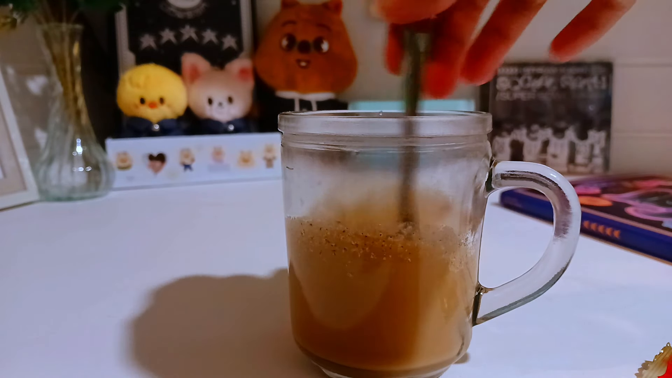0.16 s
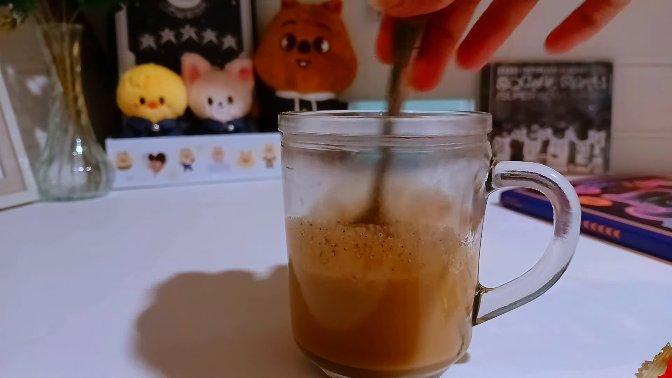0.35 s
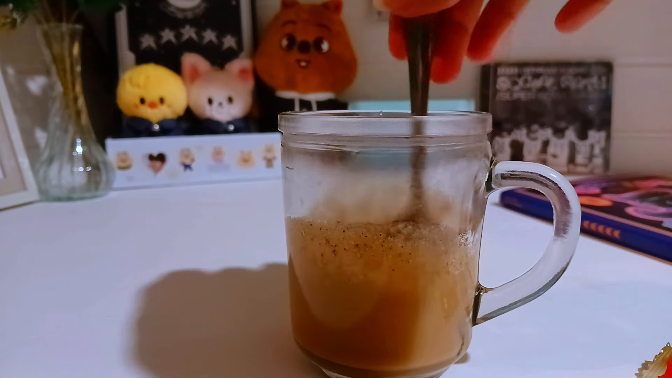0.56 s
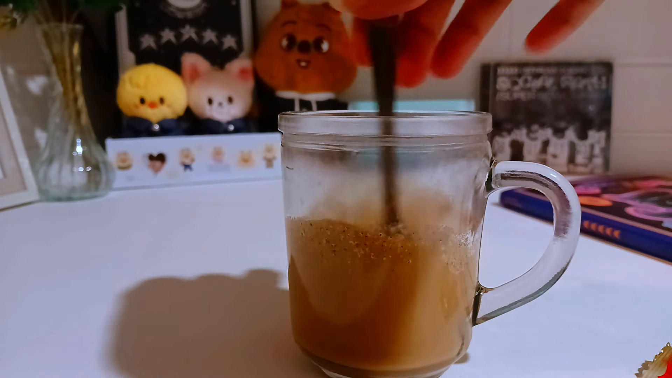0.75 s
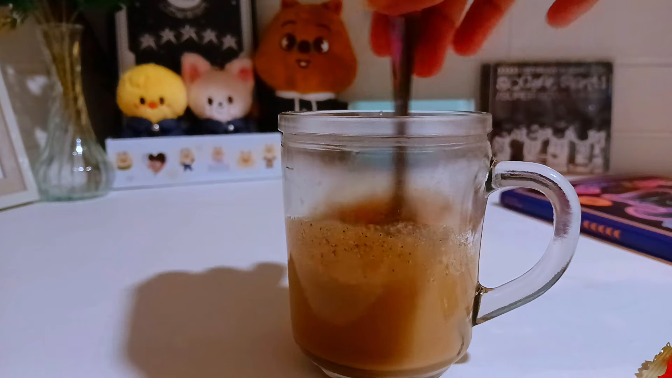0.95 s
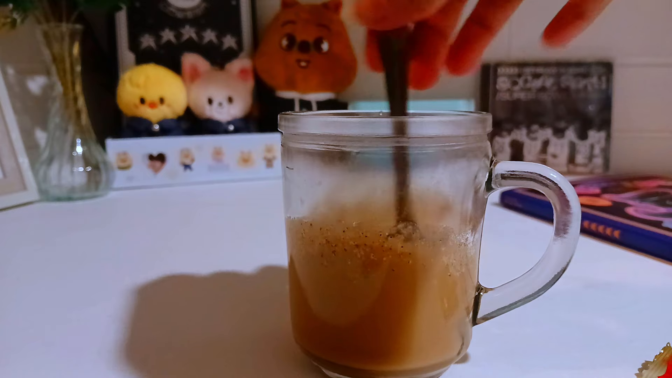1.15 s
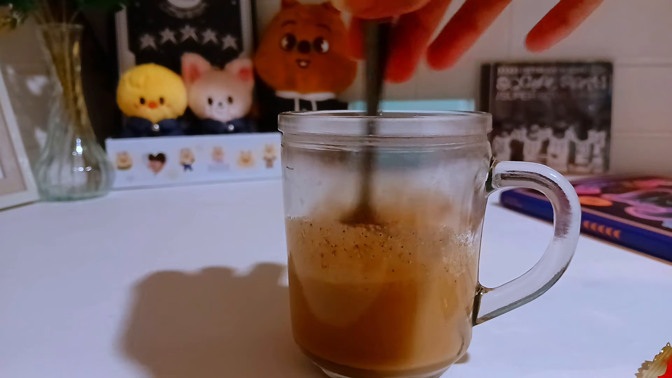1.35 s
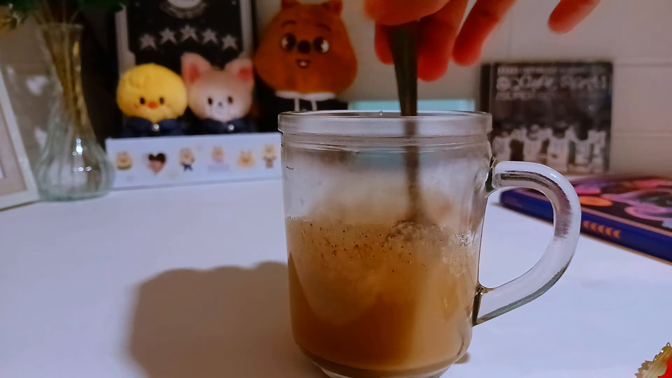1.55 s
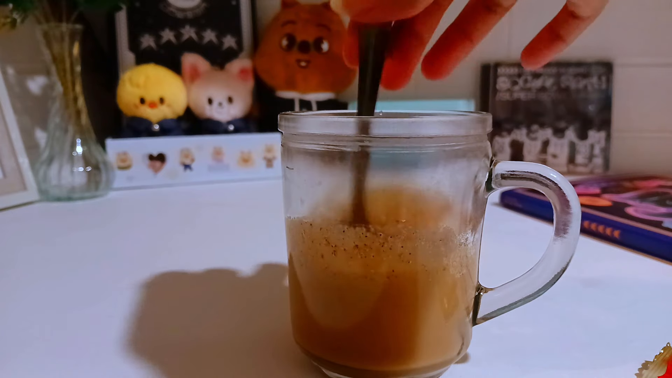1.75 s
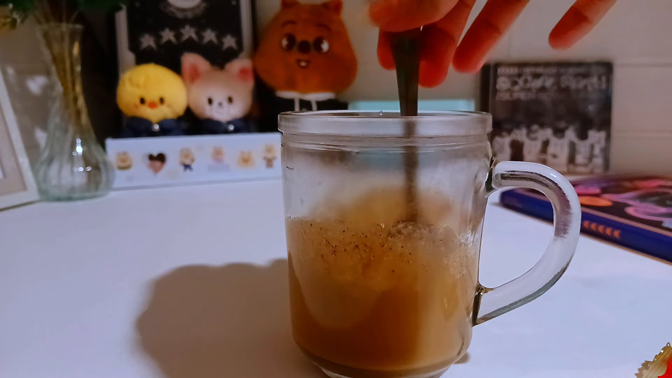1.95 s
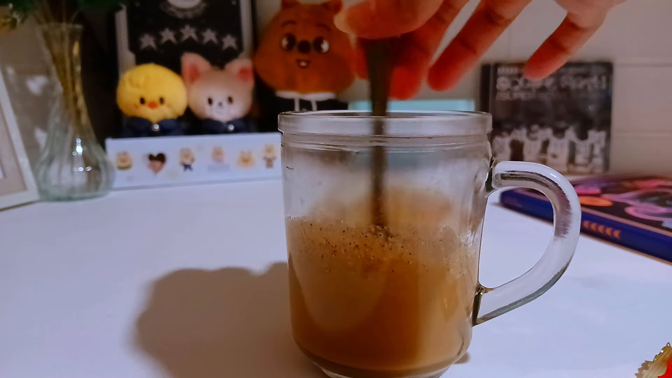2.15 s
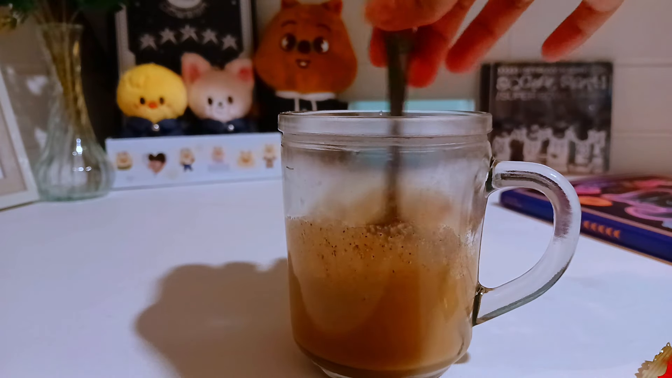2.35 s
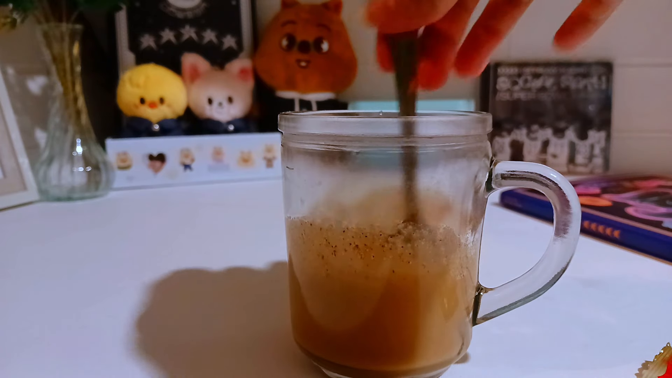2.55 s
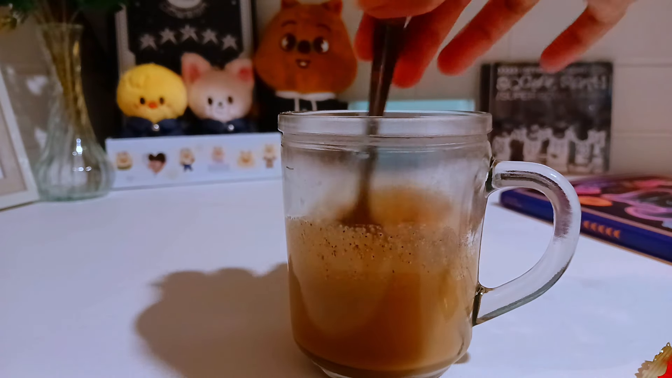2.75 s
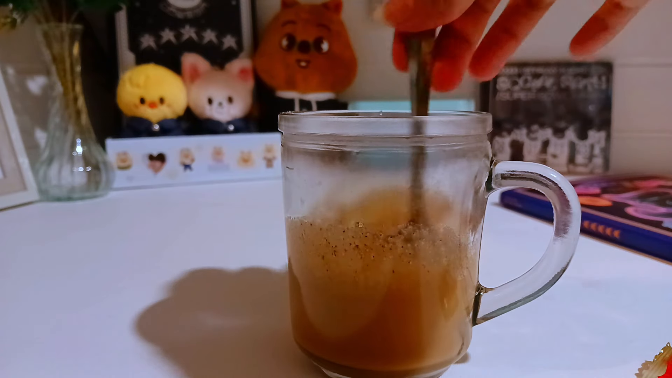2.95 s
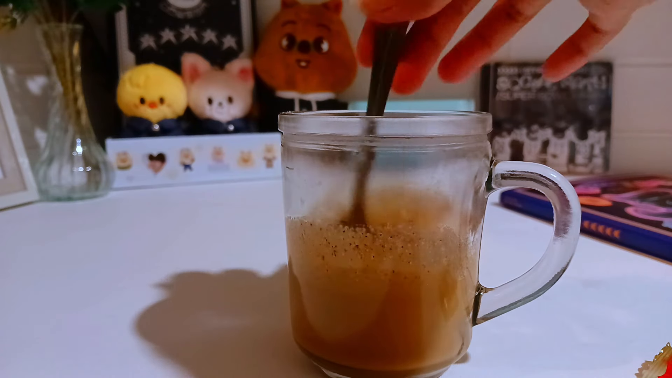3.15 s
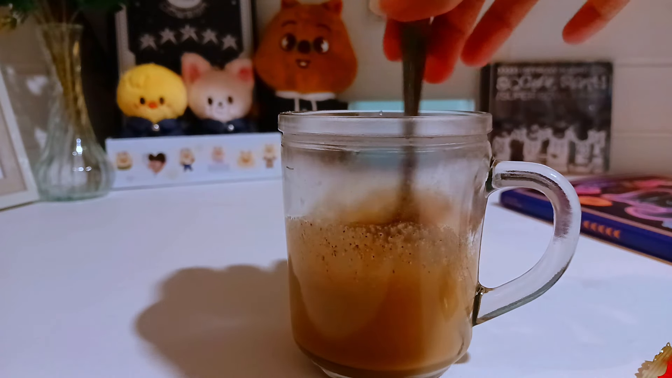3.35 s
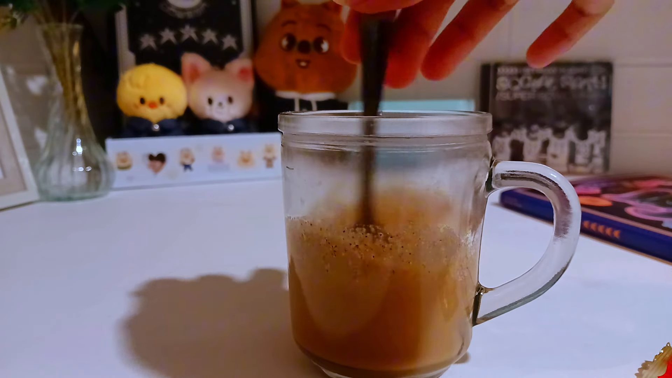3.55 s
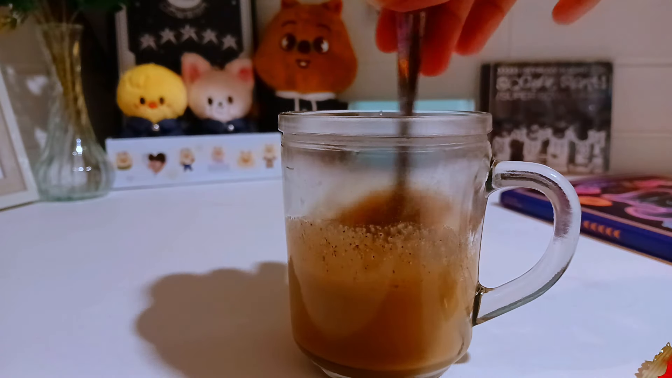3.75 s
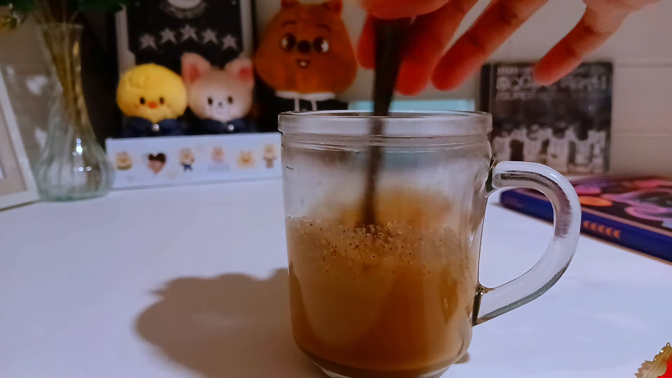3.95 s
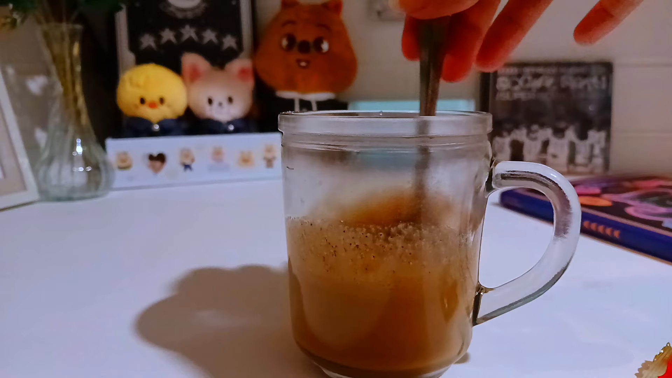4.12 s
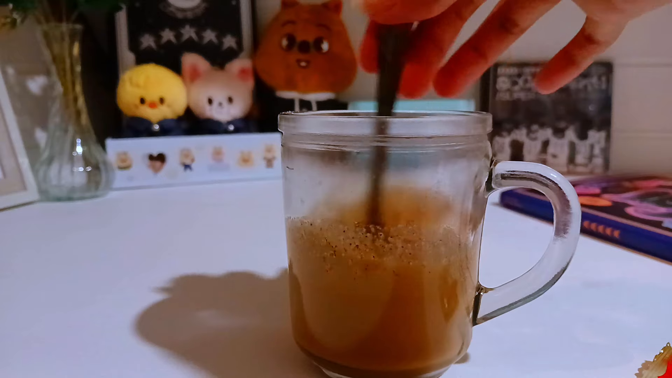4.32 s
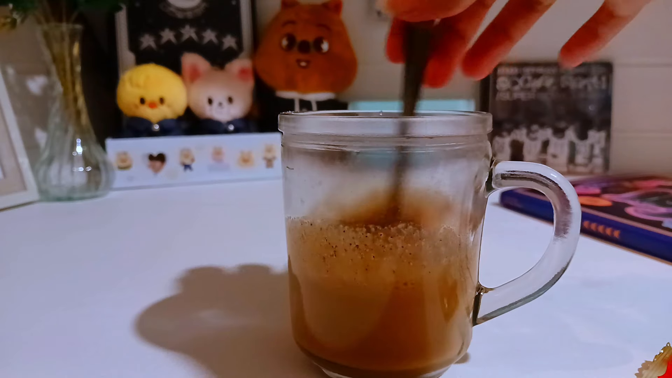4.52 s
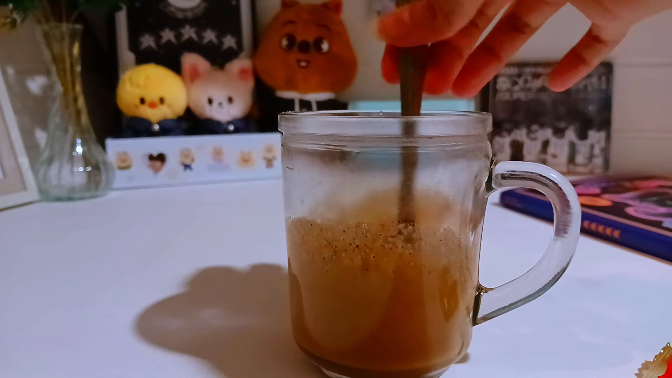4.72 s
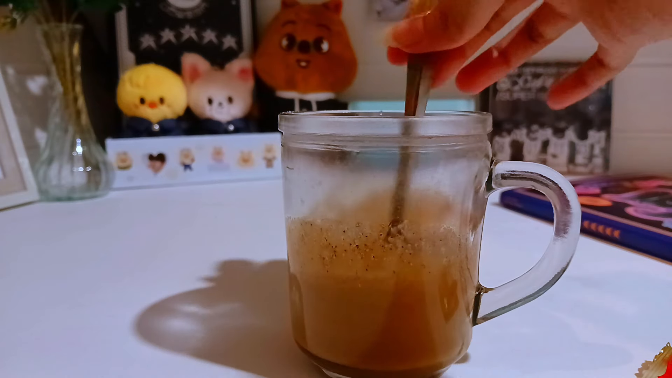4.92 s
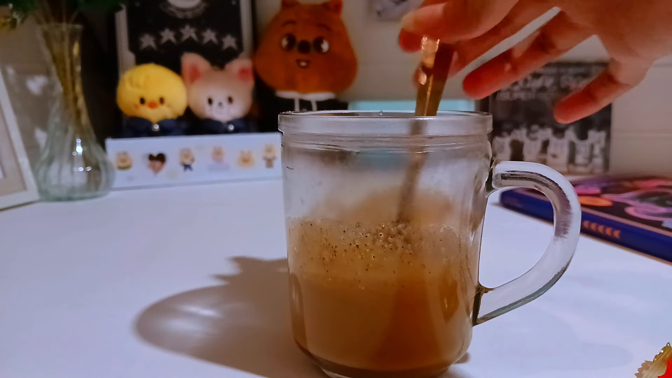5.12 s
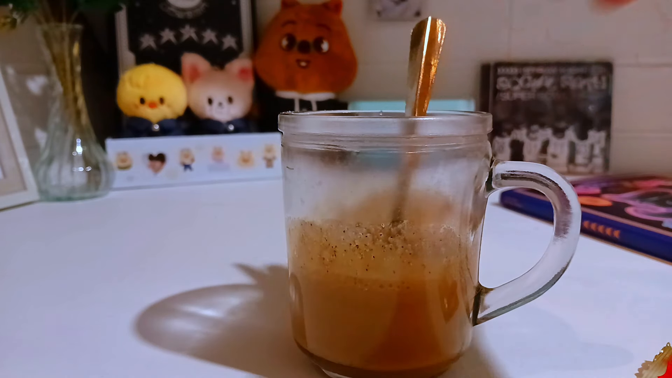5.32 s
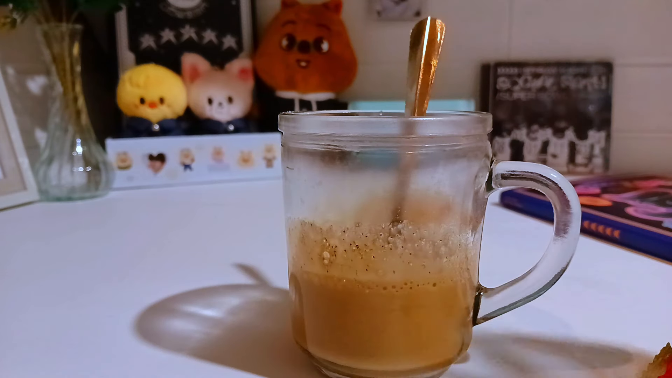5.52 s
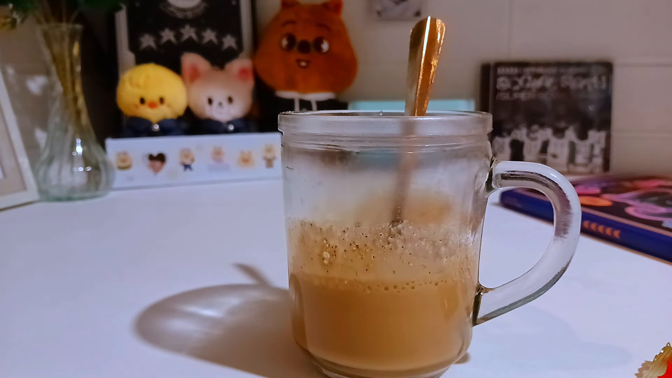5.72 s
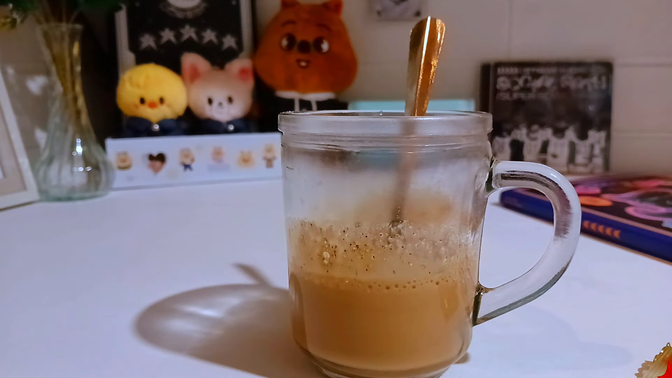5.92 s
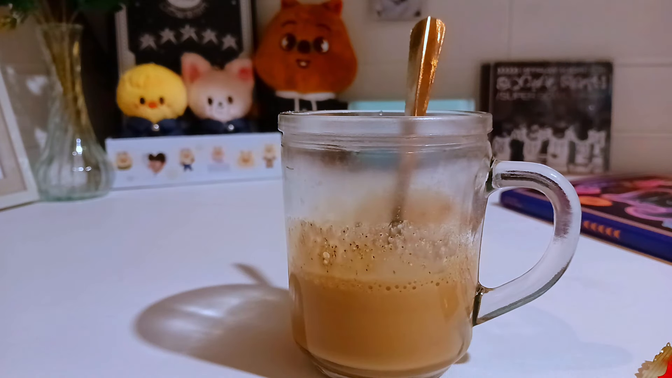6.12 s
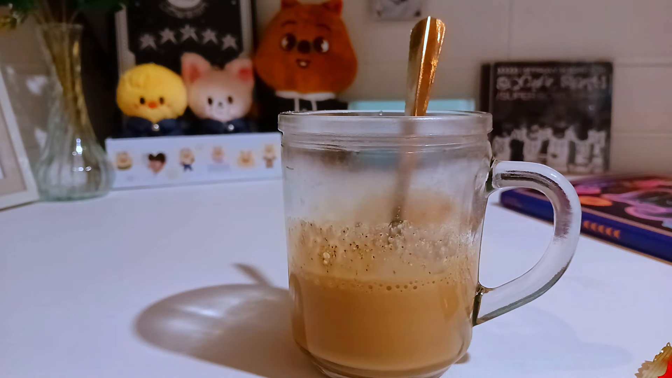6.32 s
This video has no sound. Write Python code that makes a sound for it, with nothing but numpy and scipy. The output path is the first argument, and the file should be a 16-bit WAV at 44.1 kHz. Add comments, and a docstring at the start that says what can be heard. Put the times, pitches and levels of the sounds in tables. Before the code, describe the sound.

From the start to about 4.7 seconds, a steel spoon stirs briskly in a partly filled glass mug on a desk, heard very close in stereo by a phone. The motion swells roughly three times a second, with irregular firm clinks and smaller touches between. Each blow has a crisp tick, a short liquid-muted glass ring around 2 kHz and higher, and a hollow knock near 1 kHz. Fine scraping, a soft watery wash, small gurgles and rounded plops rising in pitch fill the gaps. Two faint plops come near 4.95 seconds as the spoon is released; from 5.07 to 5.25 it rattles lightly and brightly on the rim, fading. Quiet follows until a dull, ringless desk tap at 6.2 seconds. A wavering low hum, bassy rumble and very faint hiss continue throughout; the small room adds a brief tail until the end at about 6.4 seconds.

```python
"""Over a low hum, a rumble and a faint hiss, a steel spoon clinks and scrapes in a glass mug of milky drink.
The mug stands on a desk close to a phone's two microphones, and the stirring swells about three times a second.
Each blow ticks, rings the liquid-damped glass and the spoon, and knocks on the air and desk around the drink.
Air bubbles with rising pitch make the drink plop and gurgle over a soft wash of noise.
Once let go, the spoon rattles to rest, and a dull tap follows; a small room adds a short tail."""
import sys
import numpy as np
from scipy import signal
from scipy.fft import rfft, irfft, next_fast_len
from scipy.io import wavfile
from scipy.ndimage import uniform_filter1d

SR = 44100
rng = np.random.default_rng(int(sys.argv[2]) if len(sys.argv) > 2 else 0)


def to_wav(sig):
    """Store sig (one row per channel, or 1-D mono) as 16-bit WAV at the path in sys.argv[1].

    Samples outside -1..1 are clipped; the rate is SR.
    """
    pcm = np.clip(np.atleast_2d(sig), -1, 1) * 32767
    pcm = np.round(pcm).astype(np.int16)
    wavfile.write(sys.argv[1], SR, pcm.T)  # frames by channels


N = 281356  # length in samples

# ways the spoon's bowl rings, with relative levels:
# (pitch [Hz], time to fade by 60 dB [s], level [dB], left minus right [dB], left phase lead [rad])
SPOON_MODES = [(9440, .06, -9, -3, -1.5), (9530, .035, -4, -3, -.6), (9730, .035, -4, -3, 2.6),
               (10140, .04, 0, 4, .5), (10060, .018, 0, 1, -2.4), (10330, .06, -10, 5, -.5),
               (10600, .02, -10, 4, -2.2), (12710, .085, -13, -3, 2.2), (14210, .06, -24, -2, .5),
               (14560, .04, -20, -2, -.5)]
# air above the drink, mug foot and desk top, with relative levels:
# (pitch [Hz], time to fade by 60 dB [s], level [dB], left minus right [dB], left phase lead [rad])
HOLLOW_MODES = [(437.7, 0.22, -18, -2.5, 0.37), (590.3, 0.16, -17, -2.5, 0.45),
                (719, 0.13, -13, -1.5, 0.77), (818, 0.1, -12, -14, 0.52), (1014.4, 0.087, 1.5, -0.5, .8),
                (1091, 0.048, 4.5, -1.5, 0.53), (1274, 0.064, -2, -5, 0.88), (1439, 0.051, 1, -4.5, 0.3),
                (1558, 0.063, -7, 3, 0.44), (1540, 0.087, -21.5, -10, 0.44)]
# tone colour of a soft thud or splash: (frequency [Hz], relative level [dB])
THUD_COLOUR = [(200, -13), (400, -8.5), (700, -0.5), (1100, 0.5), (1550, -9), (1900, -10.5), (3000, -20),
               (6000, -32), (16000, -28)]

RING = int(.25 * SR)  # longest ring of one event, in samples
ATTACK = int(.025 * SR)  # opening stretch over which an event's level is set, in samples
AGE = np.arange(RING) / SR  # seconds since an event began
SIDES = np.array([[.5], [-.5]])  # half of a left-right difference for each microphone

# the spoon circles the mug and is fastest once a lap; when it stops the drink settles
LAP_S, FASTEST_S, LAP_SWING_DB = .352, 0.024, 4
STOP_S, SETTLE_S, REST_DB = 4.72, 0.047, -4.5


def undb(db):
    """Turn decibels into a gain."""
    return 10 ** (np.asarray(db) / 20)


def fade(t60):
    """A decay that loses 60 dB in t60 seconds."""
    return np.exp(-np.log(1000) * AGE / t60)


def level(x, db, size=None):
    """Scale x so that its first size samples (or all of them) have an rms of db."""
    return x * undb(db) / np.sqrt(np.mean(x[..., :size] ** 2) + 1e-30)


def curve(rows):
    """Join the levels of a (time, level) table by straight lines."""
    rows = np.array(rows)
    return np.interp(np.arange(N) / SR, rows[:, 0], rows[:, 1])


def add(out, s, x):
    """Mix x into out from s seconds on."""
    i = max(int(s * SR), 0)
    out[..., i:i + x.shape[-1]] += x[..., :N - i]


def colour(x, points):
    """Shape x by (Hz, dB) points with a filter that never sounds ahead of its input."""
    hz, db = np.transpose(points)
    size = next_fast_len(x.shape[-1] + 4096, True) // 2 * 2
    f = np.maximum(np.fft.rfftfreq(size, 1 / SR), 1)
    # folding the cepstrum forward in time gives the filter minimum phase
    cepstrum = irfft(np.log(undb(np.interp(np.log(f), np.log(hz), db))))
    cepstrum[1:size // 2] *= 2
    cepstrum[size // 2 + 1:] = 0
    return irfft(rfft(x, size) * np.exp(rfft(cepstrum)))[..., :x.shape[-1]]


def ports(x, pan_db, lead_ms):
    """One sound at two microphones: a level difference, and a longer path to the right one."""
    f = np.fft.rfftfreq(len(x), 1 / SR)
    late = irfft(rfft(x) * np.exp(-2j * np.pi * f * lead_ms / 1000), len(x))
    return np.array([x * undb(pan_db / 2), late * undb(-pan_db / 2)])


def ring(modes, scatter_db, detune, wobble=0.27):
    """Modes struck once; the spot hit sets their strength, and the moving drink makes each ring unsteady."""
    out = np.zeros((2, RING))
    chances = rng.standard_normal((len(modes), 4))  # random pitch, strength, balance and sign
    for (hz, t60, db, pan_db, lead), c in zip(modes, chances):
        age = AGE[:int(1.3 * t60 * SR)]
        knots = AGE[::220]  # a new random target every 5 ms
        sway, drift = (np.interp(age, knots, row) for row in rng.standard_normal((2, len(knots))))
        turn = 2 * np.pi * hz * (1 + detune * c[0]) * age + wobble * drift
        gain = np.sign(c[3]) * undb(db + scatter_db * c[1] + SIDES * (pan_db + 2 * c[2]))
        envelope = np.exp(wobble * sway - np.log(1000) * age / t60)
        out[:, :len(age)] += gain * envelope * np.sin(turn + SIDES * lead)
    return out


def burst(points, t60, tail_db, tail_t60, pan_db, lead_ms):
    """A short crack of noise, then its scatter from the things on the desk, unlike at each microphone."""
    crack = ports(rng.standard_normal(RING) * fade(t60), pan_db, lead_ms)
    scatter = rng.standard_normal((2, RING)) * fade(tail_t60) * undb(tail_db + SIDES * pan_db)
    return colour(crack + scatter, points)


def bubble(hz, cycles, glide):
    """A pocket of air rings as a fading sine and rises in pitch as it nears the surface."""
    life = cycles / hz
    pitch = hz * (1 + glide * np.minimum(AGE / life, 1))
    onset = 1 - np.exp(-AGE * hz / 2)
    return np.sin(2 * np.pi * np.cumsum(pitch) / SR) * fade(life) * onset


def place(s):
    """Where the spoon is on its lap at time s: 1 on the side where it is fastest, -1 opposite."""
    return np.cos(2 * np.pi * (np.minimum(s, STOP_S) - FASTEST_S) / LAP_S)


def vigour(s):
    """How hard the drink moves at time s, in dB: a swell every lap, settling after the stop."""
    settled = 1 - np.exp(-np.maximum(s - STOP_S, 0) / SETTLE_S)
    return LAP_SWING_DB * place(s) + REST_DB * settled


def background(hum_hz=72, waver_hz=1.5, hum_db=0, rumble_db=1, hiss_db=-66, apart_db=-17):
    """A wavering hum swells and sinks inside a broad rumble of shaped noise; the microphones hiss."""
    # changing level of the low hum: (time [s], level [dB])
    hum_levels = [(0, -32.5), (.25, -43), (.8, -49), (.9, -36), (1.08, -42.5), (1.42, -29), (1.58, -52.5),
                  (2.3, -48), (2.45, -35), (2.68, -29.5), (2.8, -40.5), (3.25, -35), (3.5, -40),
                  (3.65, -53), (6.38, -44)]
    # changing level of the broad rumble, before rumble_db: (time [s], level [dB])
    rumble_levels = [(0, -39.5), (.46, -42.5), (.56, -45), (1.1, -41.5), (2.2, -42), (2.4, -39), (2.8, -39),
                     (3.8, -43), (4.6, -40.5), (5.0, -45), (5.5, -43), (5.7, -43.5), (6.38, -46)]
    # tone colour of the rumble: (frequency [Hz], relative level [dB])
    rumble_colour = [(25, -25), (45, -20), (58, -9.5), (72, -1), (85, 2.5), (103, 0.5), (122, -5.5),
                     (137, -6), (165, -14.5), (210, -23), (275, -15.5), (370, -22), (600, -28.5),
                     (1100, -44), (2000, -69.5)]
    # tone colour of the hiss: (frequency [Hz], relative level [dB])
    hiss_colour = [(500, -3), (1000, -12), (2000, -13), (4000, -19.5), (6000, -32), (8000, -36.5),
                   (10000, -22), (12500, -16), (15500, -17.5), (16500, -37)]
    steps = np.repeat(rng.standard_normal(N // 5000 + 1), 5000)
    waver = level(uniform_filter1d(steps, size=5000)[:N], 0)
    hum = np.sin(2 * np.pi * np.cumsum(hum_hz + waver_hz * waver) / SR)
    hum = level(hum, hum_db) * undb(curve(hum_levels))
    # one rumble shared by both microphones, and a weaker one of its own for each
    broad = level(colour(rng.standard_normal((3, N)), rumble_colour), rumble_db) * undb(curve(rumble_levels))
    high_pass = signal.butter(2, 450, "high", fs=SR, output="sos")
    hiss = signal.sosfilt(high_pass, rng.standard_normal((2, N)))
    hiss = level(colour(hiss, hiss_colour), hiss_db)
    return ports(hum + broad[0], pan_db=-1.5, lead_ms=0.25) + undb(apart_db) * broad[1:] + hiss


def scrape(count=800, spread_db=7, spell_db=4.54, grit_db=-63.0, steel_db=-74):
    """While it circles, the bowl drags over the glass in short spells of tiny slips."""
    # tone colour of the bowl dragging under the drink: (frequency [Hz], relative level [dB])
    grit_colour = [(500, -10.5), (1500, 1), (2300, -5), (2900, -1), (3600, 0.5), (5000, -1), (7500, -20.5),
                   (10000, -10), (15000, -13.5), (16500, -24)]
    t = np.arange(N) / SR
    steps = np.repeat(rng.standard_normal(N // 1500 + 1), 1500)
    spells = uniform_filter1d(steps, size=700)[:N]
    slips = np.zeros(N)
    sizes = undb(spread_db * np.clip(rng.standard_normal(count), -2, 2))
    slips[rng.integers(0, N, count)] = rng.choice([-1, 1], count) * sizes
    slips *= undb(spell_db * np.clip(spells, -2, 2)) * (t < STOP_S)
    grit = burst(grit_colour, t60=0.0033, tail_db=-13.0, tail_t60=0.18, pan_db=-3.0, lead_ms=0.41)
    steel = ring(SPOON_MODES, scatter_db=1.5, detune=.002)
    out = np.zeros((2, N))
    for body, db in [(grit, grit_db), (steel, steel_db)]:
        out += level(signal.fftconvolve(slips[None], body, axes=1)[:, :N], db)
    return out * undb(vigour(t))


def swirl(count=340, centre_hz=1150, spread=0.381, wash_db=-4, swirl_db=-54):
    """Small bubbles rise while the spoon moves, and a wash follows the vigour of the stirring."""
    gurgle = np.zeros(N)
    times = rng.uniform(0, STOP_S, count)
    for s, (pitch, size) in zip(times, rng.standard_normal((count, 2))):
        pocket = bubble(centre_hz * np.exp(spread * pitch), cycles=26, glide=.08)
        add(gurgle, s, pocket * undb(4 * size - 2 * pitch ** 2))  # unusual pitches are weaker
    wash = level(colour(rng.standard_normal(N), THUD_COLOUR), wash_db)
    drink = (level(gurgle, 0) + wash) * undb(vigour(np.arange(N) / SR) + swirl_db)
    return ports(drink, pan_db=-4, lead_ms=0.17)


def contact(bounce_db, span_s, count):
    """The force of a blow: a first touch, then ever weaker bounces as the steel chatters on the glass."""
    force = np.zeros(int(.06 * SR))
    when = rng.uniform(.03, 1, count)  # as a share of span_s
    size = rng.standard_normal(count) * np.exp(-2 * when)
    size *= undb(bounce_db) / np.linalg.norm(size)
    spots = np.minimum(when * span_s * SR, len(force) - 1).astype(int)
    np.add.at(force, spots, size)
    force[0] = 1
    return force[None]


def struck(response, force, db):
    """A body's response to a force, at a given level."""
    return level(signal.fftconvolve(response, force, axes=1)[:, :RING], db, ATTACK)


def clinks(knock_db=-6.0, thud_db=-10.0, tick_db=-27.5, rim_db=-1.5, high_db=-1.5, spoon_db=-24.0,
           handle_db=-10, buzz_db=-10, build_s=0.0023):
    """Blows sound the bodies by strength and place; the loose spoon chatters longer and its handle joins in."""
    # the spoon hits the glass; the spot hit decides how much each part answers (levels before offsets):
    # (time [s], blow strength [dB], hollow knock [dB], rim ring [dB], high ring [dB])
    blows = [(0.0034, -29.5, -30, -32.5, -61), (0.0471, -20.5, -29.5, -36, -53),
             (0.1191, -8.5, -23, -30, -34.5), (0.4416, -11.5, -27, -26, -41),
             (0.634, -28.5, -28, -25.5, -60), (0.683, -20, -30, -33.5, -55), (0.7563, -14, -26, -28, -47),
             (0.823, -31.5, -29.5, -45, -73), (0.8634, -37.5, -30, -65, -72), (0.955, -18, -23, -21, -60),
             (1.0499, -18.5, -27, -35, -44), (1.1086, -13.5, -27, -25, -46.5),
             (1.3547, -19, -31.5, -30.5, -51), (1.3936, -19.5, -26, -32.5, -43),
             (1.4678, -10, -22, -25.5, -46), (1.53, -30, -30, -41, -61), (1.6462, -26.5, -35, -26, -72),
             (1.683, -33.5, -33.5, -39, -65), (1.8187, -13.5, -22, -27.5, -60),
             (2.0294, -13.5, -25, -21.5, -39), (2.0617, -23.5, -26.5, -38, -55),
             (2.168, -14.5, -25, -23, -59), (2.2154, -34.5, -29.5, -76.5, -75),
             (2.386, -15.5, -27, -23.5, -44), (2.5066, -10, -24, -21, -48), (2.5732, -27, -28.5, -44, -64),
             (2.6547, -36, -26.5, -53, -66), (2.6748, -24, -33.5, -26, -68),
             (2.7197, -36.5, -29, -33.5, -54), (2.7826, -24.5, -31, -34, -61),
             (2.8691, -10.5, -22, -22.5, -43), (3.0512, -15, -22.5, -21, -64), (3.2184, -11, -21, -21, -45),
             (3.3838, -19, -31, -25, -58), (3.5243, -30, -31, -39.5, -47), (3.5801, -7.5, -25.5, -26, -37),
             (3.667, -34, -32.5, -42, -71), (3.7682, -21, -25.5, -20, -72),
             (3.8216, -34.5, -31, -48.5, -63), (3.8777, -25, -31, -29.5, -59), (3.9708, -8, -25, -25, -43),
             (4.0371, -24, -27.5, -49, -66), (4.1428, -27, -35, -28, -73), (4.2433, -19.5, -30, -36, -51),
             (4.338, -9.5, -21.5, -25, -45), (4.4133, -29, -29.5, -47, -67),
             (4.6141, -23, -23, -40.5, -39.5), (4.6619, -47, -29, -62, -83), (4.7091, -41, -29, -64.5, -81),
             (5.0716, -29.5, -40.5, -20.5, -51), (5.1248, -30, -43, -31, -46),
             (5.1514, -35.5, -44.5, -27.5, -62), (5.2091, -40.5, -54, -47, -55),
             (5.2264, -43.5, -50, -33, -57)]
    # ways the filled mug rings, with relative levels:
    # (pitch [Hz], time to fade by 60 dB [s], level [dB], left minus right [dB], left phase lead [rad])
    glass_modes = np.array([(2112, .17, -17, 4, 2.6), (2278, .097, 0, -9, 2.0), (2200, .03, -11, -6, 1.5),
                            (2340, .04, -9, -8, 1.0), (2460, .025, -15, -6, 1.5), (4978, .097, 0, -4, -2.4),
                            (5612, .1, -13, 3, 1.0), (6764, .11, 0, 8, 1.5), (7710, .07, -20, 0, 2.0)])
    # pitches that part the mug's rings into rim, two middle families and high: (frequency [Hz])
    family_edges = [4000, 5300, 6200]
    # how the two middle families answer: (level at a firm blow [dB], growth with strength [dB per dB],
    # swing with the spoon's place round the mug [dB], change once the spoon is loose [dB])
    middle_walls = [(-35, 1.53, 4.5, -19), (-47.5, 0.6, -1, -4)]
    # ways the spoon's handle rings, which the fingers damp until they let go, with relative levels:
    # (pitch [Hz], time to fade by 60 dB [s], level [dB], left minus right [dB], left phase lead [rad])
    handle_modes = [(2040, .05, -4, -4, 2), (2190, .06, 0, -6, 2), (2370, .05, 0, -6, 1.5),
                    (2540, .04, -7, -5, 1), (2750, .06, -11, -4, -1), (5615, .13, -14, 2, 1),
                    (6850, .025, -8, 3, 1.5), (8550, .05, -11, 0, -2.5), (10370, .08, -5, 2, -1),
                    (11260, .1, -10, 0, -2), (11650, .03, -4, 0, 0), (12700, .06, -9, -2, 2),
                    (14200, .05, -9, -2, .5), (14570, .05, -9, -2, -.5)]
    # tone colour of the spoon's tick: (frequency [Hz], relative level [dB])
    tick_colour = [(300, -11), (700, -16), (1500, 9.5), (1900, -3), (2700, 5), (3000, 1.5), (3600, 5),
                   (4200, -3), (4600, -1.5), (6000, -8.5), (7600, -11), (9000, -1), (10800, -3.5),
                   (12000, -10.5), (14600, -11.5), (16500, -30)]
    # tone colour of the loose handle buzzing on the rim: (frequency [Hz], relative level [dB])
    buzz_colour = [(500, -20), (1700, 0), (2300, 23.5), (2750, -4), (3300, -9), (5200, -13), (6900, 2),
                   (7900, -3), (10400, 6), (12300, -17), (13400, -7), (14500, -14), (16500, -17)]
    let_go_s, firm_db = 5.0, -10
    tick_growth, bowl_growth, rim_growth = 0.91, 1.46, 0.33  # dB per dB of blow strength
    # offsets for loose blows: a weaker tick and bowl ring, and a gain on their listed knock levels
    loose_tip_db, loose_listed_knock_gain_db = -17, 9

    out = np.zeros((2, N))
    family = np.searchsorted(family_edges, glass_modes[:, 0])
    build = 1 - np.exp(-AGE / build_s)  # the bending wave needs a moment to run round the mug
    for s, strength, knock, rim, high in blows:
        loose = s > let_go_s
        hard = strength - firm_db
        tip = hard + loose * loose_tip_db
        knock = knock + loose * loose_listed_knock_gain_db
        force = contact(-9, .014, count=7)
        if loose:
            force = contact(2, .04, count=30)

        hollow = build * ring(HOLLOW_MODES, scatter_db=3.0, detune=.02)
        blow = level(hollow, knock + knock_db, ATTACK)
        thud = burst(THUD_COLOUR, t60=0.053, tail_db=-13.0, tail_t60=0.24, pan_db=0, lead_ms=0.091)
        blow += level(thud, knock + thud_db, ATTACK)
        tick = burst(tick_colour, t60=0.014, tail_db=-7.0, tail_t60=0.059, pan_db=-4.5, lead_ms=0.14)
        blow += struck(tick, force, tick_db + tick_growth * tip)

        glass_levels = [rim + rim_db + rim_growth * hard]
        for db, growth, swing, freed in middle_walls:
            glass_levels.append(db + growth * hard + swing * place(s) + loose * freed)
        glass_levels.append(high + high_db)
        for k, db in enumerate(glass_levels):
            glass = ring(glass_modes[family == k], scatter_db=3, detune=.0012)
            blow += struck(build * glass, force, db)

        spoon = ring(SPOON_MODES, scatter_db=3, detune=.003) * (1 - fade(0.00037))
        blow += struck(spoon, force, spoon_db + bowl_growth * tip)
        if loose:
            handle = ring(handle_modes, scatter_db=1.5, detune=.003)
            blow += struck(handle, force, strength + handle_db)
            buzz = burst(buzz_colour, t60=0.014, tail_db=0, tail_t60=0.069, pan_db=-1, lead_ms=0.13)
            blow += struck(buzz, force, strength + buzz_db)
        add(out, s, blow)
    return out


def plop(start_hz=1054, spread=.07, bubble_db=-3, splash_db=-6, hollow_db=-7):
    """One plop: a bubble and a soft splash that rings the air in the mug."""
    hz = start_hz * np.exp(spread * rng.standard_normal())
    pocket = ports(bubble(hz, cycles=52, glide=0.21), pan_db=-2, lead_ms=0.025)
    splash = burst(THUD_COLOUR, t60=0.021, tail_db=-6.5, tail_t60=0.12, pan_db=-2.5, lead_ms=.13)
    hollow = ring(HOLLOW_MODES, scatter_db=3.0, detune=.03) * (1 - fade(0.036))
    out = level(pocket, bubble_db, ATTACK)
    out += level(splash, splash_db, ATTACK)
    return out + level(hollow, hollow_db, ATTACK)


def plops(count=18, small_db=-50, scatter_db=3):
    """Air closes behind the spoon: loud plops, and small ones at random for as long as it circles."""
    # the loudest pockets of air closing behind the spoon: (time [s], gain [dB])
    loud_plops = [(0.01, -42), (0.185, -36), (0.203, -41), (0.315, -42), (0.464, -33), (0.625, -35),
                  (0.72, -43), (0.983, -38), (1.321, -41), (1.337, -37.5), (1.567, -34.5), (1.603, -38.5),
                  (1.695, -37), (1.767, -37.5), (1.857, -39), (1.913, -40), (1.994, -40), (2.012, -43),
                  (2.1, -51), (2.315, -39), (2.484, -31.5), (2.601, -37.5), (2.752, -39.5), (2.858, -31.5),
                  (2.902, -37.5), (2.973, -40), (3.075, -43), (3.155, -36.5), (3.251, -40.5), (3.429, -34),
                  (3.504, -37), (3.607, -34.5), (3.687, -41.5), (3.913, -45), (4.016, -38), (4.108, -39),
                  (4.195, -33), (4.523, -45), (4.549, -50), (4.934, -44.5), (4.972, -42)]
    out = np.zeros((2, N))
    for s, db in loud_plops:
        add(out, s, plop() * undb(db))
    for k in range(count):
        s = STOP_S * (k + rng.random()) / count
        db = small_db + vigour(s) + scatter_db * rng.standard_normal()
        add(out, s, plop() * undb(db))
    return out


def taps():
    """Dull taps on the desk: short shaped noise with no ring of glass."""
    # when the taps fall: (time [s], level [dB])
    tap_times = [(6.128, -67.5), (6.151, -75), (6.210, -42.5)]
    # tone colour of a tap: (frequency [Hz], relative level [dB])
    tap_colour = [(150, 2.5), (600, -1.5), (1500, -0.5), (2800, -3.5), (4500, -16), (7000, -22.5),
                  (10000, -14.5), (15000, -20)]
    out = np.zeros((2, N))
    for s, db in tap_times:
        tap = burst(tap_colour, t60=0.029, tail_db=-0.5, tail_t60=0.17, pan_db=-3, lead_ms=0.017)
        add(out, s, level(tap, db, ATTACK))
    return out


def room(x, wet_db=-13, low_t60=0.27, high_t60=0.2, split_hz=3000, high_db=-4, onset_s=0.0069):
    """A small furnished room: a diffuse tail of fading noise whose treble dies first."""
    age = np.arange(SR // 2) / SR
    noise = rng.standard_normal((2, len(age))) * (1 - np.exp(-(age / onset_s) ** 2))
    low = signal.sosfilt(signal.butter(2, split_hz, fs=SR, output="sos"), noise)
    slow = np.exp(-np.log(1000) * age / low_t60)
    fast = np.exp(-np.log(1000) * age / high_t60)
    tail = low * slow + (noise - low) * fast * undb(high_db)
    tail *= undb(wet_db) / np.linalg.norm(slow)
    return x + signal.fftconvolve(x, tail, axes=1)[:, :N]


def scene():
    """The mug and the desk in the room, over the background."""
    return room(scrape() + swirl() + clinks() + plops() + taps()) + background()


def record(dry):
    """The phone cuts the deepest bass and the top."""
    dry = signal.sosfilt(signal.butter(2, 28, "high", fs=SR, output="sos"), dry)
    return signal.sosfilt(signal.ellip(8, .2, 70, 16500, fs=SR, output="sos"), dry)


dry = scene()
out = record(dry)
to_wav(out)
```